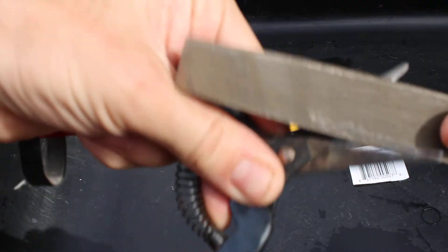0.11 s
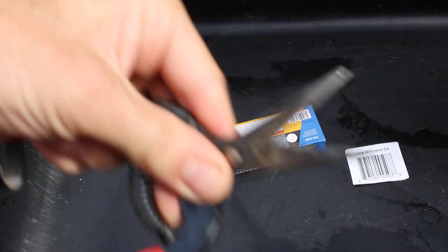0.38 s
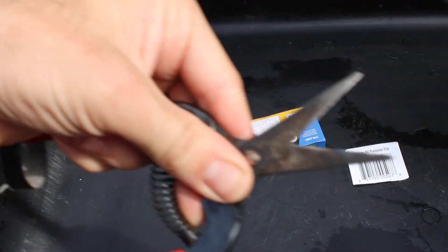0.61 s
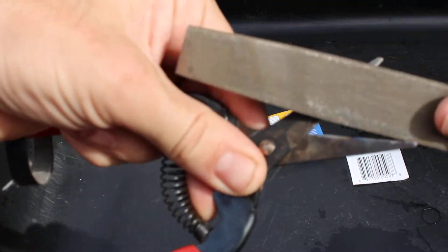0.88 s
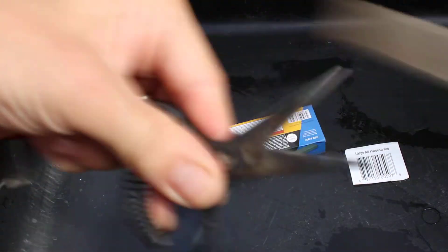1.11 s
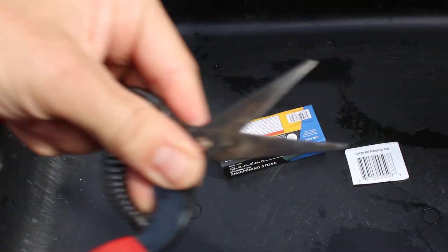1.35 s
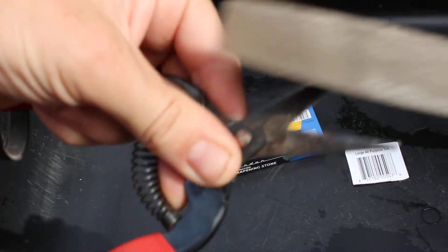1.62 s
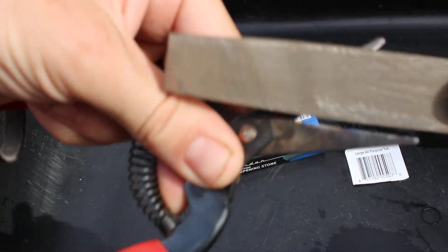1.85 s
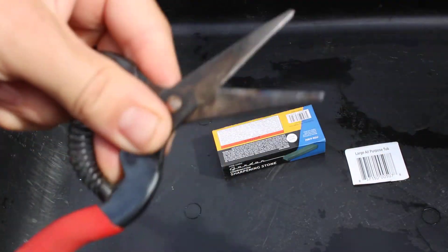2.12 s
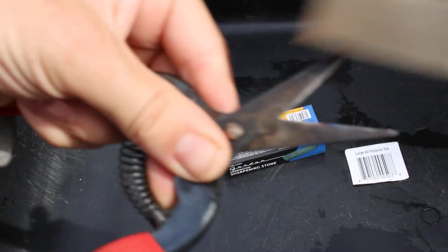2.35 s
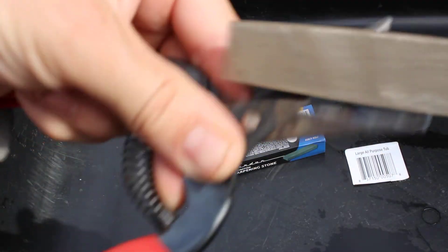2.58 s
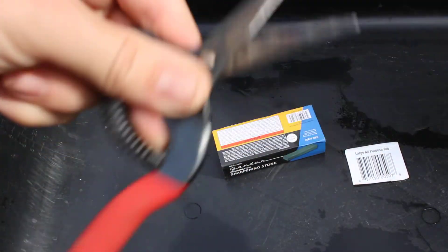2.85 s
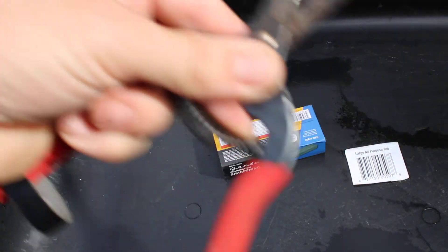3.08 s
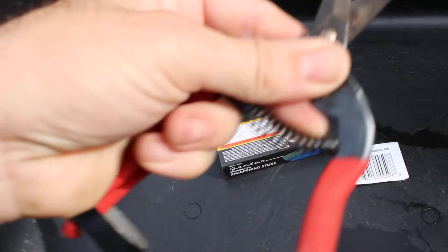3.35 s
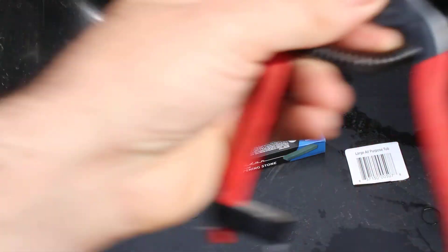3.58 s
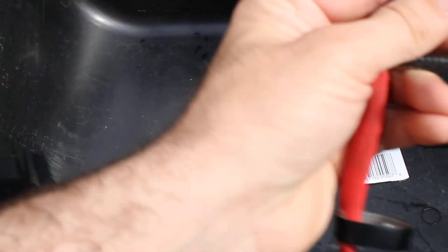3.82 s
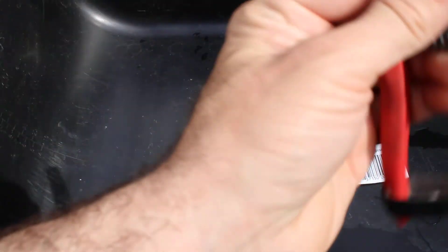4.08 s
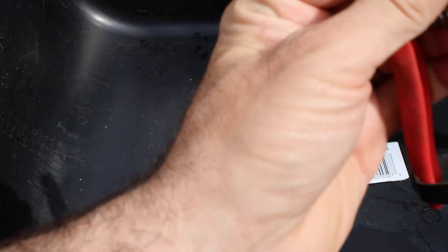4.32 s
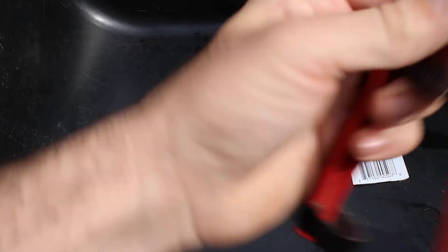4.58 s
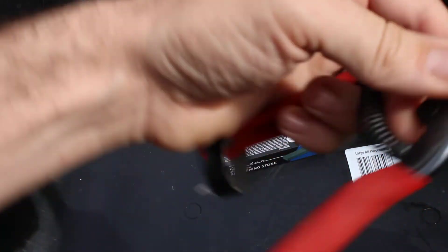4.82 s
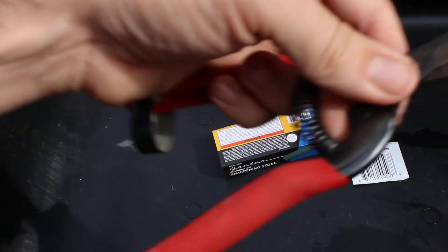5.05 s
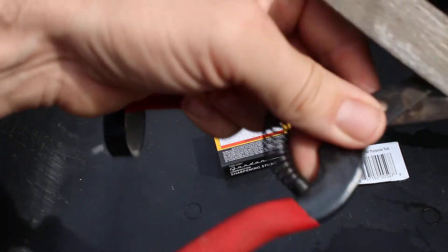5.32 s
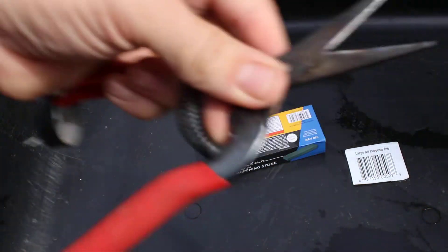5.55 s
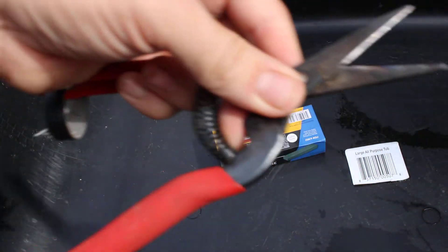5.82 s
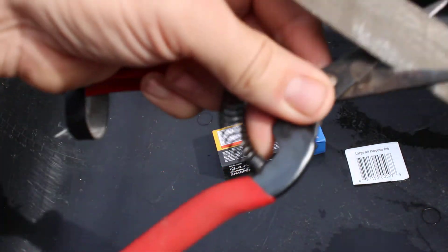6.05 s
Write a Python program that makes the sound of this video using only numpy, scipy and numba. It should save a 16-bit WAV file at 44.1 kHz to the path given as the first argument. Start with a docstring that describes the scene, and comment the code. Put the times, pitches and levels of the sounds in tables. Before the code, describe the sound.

Hand filing of shears, heard close up and dry: hard taps as steel meets steel, gritty scrapes that speed up within a tenth of a second, and abrupt bright snaps at release. After four strokes comes a two-second lull with faint handling clicks and soft road noise, then one strong stroke and new contact. Low wavering hum and thin insect trill continue, and automatic gain dips the background after loud blows.

```python
"""Filing the blades of a pair of shears

A flat hand file is laid on a short steel blade and pushed off its tip, stroke after stroke. Tooth impacts and
grit noise drive resonators for the bending blade and the modes of blade and file; taps excite the same steel.
Ticks and rubs are shaped noise. Far traffic (coloured noise), a motor hum (wavering sines) and an insect
(narrow-band noise) lie behind; automatic gain ducks everything after loud sounds."""
import sys
import numpy as np
from scipy import signal
from scipy.fft import rfft, irfft
from scipy.io import wavfile
from scipy.ndimage import uniform_filter1d
from numba import njit

SR = 44100
rng = np.random.default_rng(int(sys.argv[2]) if len(sys.argv) > 2 else 0)


def pcm_store(signal):
    """Save signal as 16-bit PCM."""
    levels = np.round(np.clip(np.atleast_2d(signal), -1, 1) * 32767)
    wavfile.write(sys.argv[1], SR, levels.astype(np.int16).T)


def ratio(d):
    """dB to gain"""
    e = np.asarray(d, float) / 20
    return 10 ** e


N = 272534

# Blows as steel lands on or leaves steel. Each row: time in seconds, relative peak in dB, brightness in dB,
# share of the lowest modes in dB, share of the file ring in dB, third bending pitch in Hz,
# relative level of the skid that follows in dB.
LANDINGS = [(0.0004, -6.5, -6, -28.5, -19, 3200, -26.5), (0.0227, -14.5, -19, -24, -31, 3140, -46),
            (0.2040, -11.5, -13, -12, -25, 3300, -34), (0.2814, 1.5, -7.5, -16, -37, 3760, -46.5),
            (0.8487, 2, -5, -10.5, -20, 3360, -30), (1.1244, -0.5, -14, -22, -50, 3550, -50),
            (1.732, -13, 1.5, -28.5, -27, 3620, -28), (2.001, 3.5, -22, -21.5, 4, 3960, -53),
            (2.4655, -8, -1, -32, -27.5, 3480, -15), (2.5052, -2.5, -16, -18.5, -30.5, 3370, -34.5),
            (2.6928, 7, -3, -30, -40.5, 3650, -55), (5.1915, -14, -6, -13, -4, 3080, -36),
            (5.371, -7.5, -17, -23.5, -20.5, 4080, -41), (5.3752, -2.5, -19, -22.5, -24.5, 4200, -38),
            (5.3802, -6.5, -13.5, -23.5, -25, 4100, -45), (6.0280, 2, -4, -7.5, -30, 3550, -20.5),
            (6.0663, -8.5, -39.5, -7, -36, 4160, -28), (6.1471, -20.5, -20, 9, -25, 3870, -42)]


def noise():
    """White Gaussian noise: equal mean power at all frequencies."""
    return rng.standard_normal(N)


def unit(x):
    """Normalisation to an rms of one."""
    return x / np.sqrt(np.mean(x ** 2))


def colour(x, points):
    """Minimum-phase filtering: a causal response through (Hz, dB) points, from the folded cepstrum."""
    hz, db = np.transpose(points)
    grid = np.arange(2049) * SR / 4096 + 1
    cepstrum = irfft(np.log(ratio(np.interp(np.log(grid), np.log(hz), db))))
    cepstrum[1:2048] *= 2
    cepstrum[2049:] = 0
    response = irfft(np.exp(rfft(cepstrum)))
    return signal.fftconvolve(x, unit(response) / 64)[:N]  # unit energy over 4096 samples


def walk(rate):
    """Random modulation: Gaussian levels held for 1 / rate seconds and slewed, with an rms of one."""
    k = int(SR / rate)
    held = np.repeat(rng.standard_normal(N // k + 1), k)
    return unit(uniform_filter1d(held, k)[:N])


def ring(force, hz, t60):
    """Damped harmonic oscillator: one mode that decays by 60 dB in t60 seconds."""
    pole = np.exp(2j * np.pi * hz / SR - np.log(1000) / (t60 * SR))
    return signal.lfilter([0, pole.imag], [1, -2 * pole.real, abs(pole) ** 2], force)


@njit
def svf(x, hz, width):
    """State-variable resonance: a band-pass with a moving centre and a gain of one there."""
    y, b, l = np.empty(len(x)), 0., 0.
    for i in range(len(x)):
        g, k = np.tan(np.pi * hz[i] / SR), width / hz[i]
        v = (b + g * (x[i] - l)) / (1 + g * (g + k))
        b, l, y[i] = 2 * v - b, l + 2 * g * v, k * v
    return y


def steep(x, hz, width):
    """Cascaded resonance: two equal band-passes leave dark valleys on either side."""
    return svf(svf(x, hz, width), hz, width)


def band(hz, width):
    """Band-limited noise: a steep fixed resonance driven by white noise, with an rms of one."""
    return unit(steep(noise(), np.full(N, 1. * hz), 1. * width))


def bursts(at_s, db, length_ms):
    """Exponential relaxation: sudden rises that die away with a time constant of length_ms."""
    out = np.zeros(N)
    out[(at_s * SR).astype(int)] = ratio(db)
    return signal.lfilter([1], [1, -np.exp(-1000 / (length_ms * SR))], out)


def traffic():
    """Superposed broadband sources: rumble and hiss swell together, and passing tyres rise and fade."""
    # Traffic level. Each row: time in seconds, level in dB.
    swell = [(0, -42.5), (.5, -44), (1, -44), (1.3, -35.5), (1.7, -43), (2.1, -45), (2.4, -41),
             (2.8, -43.5), (3.2, -44.5), (3.6, -41), (3.9, -47), (4.3, -44), (4.7, -45.5), (5.2, -46),
             (5.6, -42), (6.18, -36.5)]
    # Spectrum of the low rumble. Each row: frequency in Hz, relative density in dB.
    rumble_spectrum = [(15, -33.5), (25, -11.5), (118, 2), (184, -7), (210, -2.5), (334, -5.5), (403, -17),
                       (600, -27.5), (780, -48), (1320, -120)]
    # Spectrum of the hiss. Each row: frequency in Hz, relative density in dB.
    hiss_spectrum = [(240, -24.5), (400, -3), (588, -10.5), (1230, -13.5), (3140, -20.5), (5550, -23),
                     (5900, -25.5), (8410, -29.5), (14400, -47.5), (15800, -55)]
    # Tyres passing. Each row: time of the peak in seconds, its level in dB, fade to either side in dB per second.
    passes = [(1.1, -48, 27.5), (2.45, -56, 42.5), (3.62, -46, 31.5), (5.2, -52, 39)]
    t = np.arange(N) / SR
    rumble_db = np.interp(t, *np.transpose(swell))
    hiss_db = rumble_db - 3
    rumble = ratio(rumble_db + 0.51 * walk(3.7)) * colour(noise(), rumble_spectrum)
    hiss = ratio(hiss_db + 0.6 * walk(5.1)) * colour(noise(), hiss_spectrum)
    tyre_gain = sum(ratio(db - fade_db * abs(t - s)) for s, db, fade_db in passes)
    tyres = tyre_gain * ratio(0.89 * walk(9.4)) * band(990, 1300)
    return rumble + hiss + tyres


def motor_hum():
    """Line spectrum: sines whose pitch and level waver at random."""
    # Hum lines. Each row: mean frequency in Hz, relative level in dB.
    lines = [(91.5, -52.5), (123.8, -51.5), (183.0, -50.5), (269.2, -54), (716.0, -61.5)]
    out = np.zeros(N)
    for hz, db in lines:
        phase = 2 * np.pi * np.cumsum(hz + 2.248 * walk(5.4)) / SR
        out += ratio(db + 0.5 + 1.2 * walk(3.3)) * np.sin(phase)
    return out


def insect():
    """Narrow-band noise under amplitude modulation: a high trill whose level flickers."""
    return ratio(-64.5 + 1.5 * walk(60)) * band(5550, 200)


def rubs():
    """Sliding friction: fingers on the handles, as uneven noise that starts and stops within milliseconds."""
    # Each row: start in seconds, length in seconds, mean level in dB, centre in Hz, width in Hz.
    slides = [(1.192, 0.1, -40, 1900, 1990), (5.125, 0.061, -48.5, 2640, 1500),
              (5.21, 0.09, -54, 1510, 1484), (5.77, 0.055, -49.5, 2400, 1510),
              (5.773, 0.051, -53, 8830, 4960)]
    t = np.arange(N) / SR
    out = np.zeros(N)
    for s, length, db, hz, width in slides:
        gate = uniform_filter1d(1. * (t > s) * (t < s + length), 400)
        out += ratio(db + 2 * walk(81)) * gate * band(hz, width)
    return out


def ticks():
    """Heavily damped impact: short broad clicks with no ring, some from light touches of file on blade, others
    from shears and file shifting in the hands."""
    # Clicks. Each row: time in seconds, relative peak in dB.
    clicks = [(0.163, -32.5), (0.3115, -10), (0.317, -15), (1.0551, -31), (1.1611, -8.5), (1.163, -29),
              (1.764, -29.5), (2.7095, -10), (2.72, -12), (2.724, -23.5), (2.7688, -26), (4.0759, -17),
              (4.544, -35.5), (4.788, -41.5), (5.142, -31), (5.2883, -33), (5.7812, -33)]
    # Spectrum of a click. Each row: frequency in Hz, relative density in dB.
    click_spectrum = [(290, -53), (500, -4.5), (3000, -3), (4290, 5.5), (4740, -4.5), (6760, -0.5),
                      (15000, -30.5)]
    return ratio(-4.5) * colour(bursts(*np.transpose(clicks), 2.9) * noise(), click_spectrum)


def rasp(force, bright_db):
    """Contact stiffness: the dry sound of tooth on steel, brighter as the contact hardens."""
    # Spectrum of the contact. Each row: frequency in Hz, relative gain in dB.
    contact_spectrum = [(200, -63), (600, -42), (1500, -18), (3000, -1), (5000, -1.5), (8000, -2.5),
                        (10500, -15), (13000, -26), (16000, -59.5)]
    body = signal.sosfilt(signal.butter(2, 5000, fs=SR, output="sos"), force)
    treble = force - body
    return colour(body + treble * ratio(bright_db + 2), contact_spectrum)


def steel(force, bright_db, low_db, second_db, file_db, free, wander_db):
    """Modal superposition: damped modes of blade and file, struck unevenly as the contact point moves."""
    # Free modes. Each row: frequency in Hz, relative level in dB, undamped 60 dB decay time in seconds.
    free_modes = [(1278, -3, .075), (1890, -10, .05), (2290, -6, .04), (2815, -3, .05), (3402, -4, .036),
                  (3530, -8, .04), (3815, -12, .05), (4500, -14, .04), (5062, 2, .065), (5072, -24, .2),
                  (5460, -6, .025), (6094, -12, .035), (6390, -10, .045), (6870, -12, .035),
                  (7300, -8, .025), (7900, -3, .035), (7985, -19, .09), (8253, -16, .035), (9170, -14, .03),
                  (9700, -12, .04), (10540, -24, .04)]

    def share(hz):
        if hz < 1600:
            return low_db
        if hz < 2600:
            return second_db
        if hz < 4800:
            return 0
        return file_db if hz < 5300 else bright_db

    modes = np.zeros(N)
    for hz, db, t60 in free_modes:
        drive = force * ratio(share(hz) + wander_db * walk(60))
        modes += ring(drive, hz, free * t60) * ratio(db)  # free: share of the ring time left by contact
    return signal.sosfilt(signal.butter(3, 1000, "high", fs=SR, output="sos"), modes)


def taps():
    """Impulse excitation: each blow rings the modes, with a millisecond decay of tooth contacts."""
    s, peak_db, *columns, _ = np.transpose(LANDINGS)
    chatter = bursts(s, peak_db, 1.0) * np.sign(noise())
    blow = np.zeros(N)
    blow[(s * SR).astype(int)] = ratio(peak_db)
    # each tap's settings take over 1 ms before it
    latest = np.clip(np.searchsorted(s, np.arange(N) / SR + .001) - 1, 0, None)
    bright_db, low_db, file_db, third_hz = (c[latest] for c in columns)
    blade = svf(ratio(9.5) * chatter + ratio(23.5) * blow, third_hz, 330.0)
    modes = steel(blow, bright_db, low_db, -16.5, file_db, free=0.9, wander_db=2.5)
    return ratio(-2) * rasp(chatter, bright_db) + blade + ratio(-10) * modes


def tooth_rows(teeth_hz):
    """Periodic impact train: evenly cut teeth strike at the pace of the file, with jitter in time and strength."""
    passed = np.floor(np.cumsum(teeth_hz * (1 + .025 * walk(900))) / SR)
    strikes = unit(np.diff(passed, prepend=0) * ratio(2 * noise()))
    return strikes


def pressed_blade(force, rows, load, speed, bright_db):
    """Loaded cantilever: pressed against the file, the blade rings broadly and its bending pitches slide."""
    light_db, full_db = -40, -5  # loads between which the lower modes change their share
    low_db = np.interp(load, (light_db, full_db), (-5.5, -27))
    second_db = np.interp(load, (light_db, full_db), (-8, -12.5))
    # second pitch, then third pitch with the file at rest and at full speed, in Hz
    first_blade, second_blade = (2240, 3530, 3700), (2050, 3940, 3950)
    turned = np.arange(N) / SR >= 4.5  # the second blade is filed from 4.5 s
    second_hz, slow_hz, fast_hz = (np.where(turned, 1. * b, a) for a, b in zip(first_blade, second_blade))
    third_hz = (slow_hz + (fast_hz - slow_hz) * speed) * (1 + 0.014 * walk(80))
    low_hz, second_hz, bright_hz = (hz * (1 + 0.051 * walk(40)) for hz in (1254, second_hz, 6230))
    first = ratio(25.5) * steep((force + ratio(3) * rows) * ratio(low_db - 4), low_hz, 170.0)
    second = ratio(21.5) * steep(force * ratio(second_db), second_hz, 330.)
    third = ratio(16) * steep(force, third_hz, 650.0)
    treble = ratio(13.5) * svf(force * ratio(bright_db), bright_hz, 600.0)
    return first + second + third + treble


def strokes():
    """Stick-slip friction: tooth rows and caught grit drive the steel while the file's pressure judders."""
    # One list a stroke. Each row: time in seconds, pressure in dB, mean rate of teeth in Hz,
    # even teeth against loose grit in dB before the teeth are band-limited.
    stroke_curves = [
        [(0.15, -49, 201.1, -10), (0.222, -45.5, 247, -10), (0.245, -13.5, 478.8, -10),
         (0.268, -19.5, 1280, -1), (0.278, -20.5, 1313, 3.5), (0.298, -44, 1300, -10)],
        [(1.05, -59.5, 200, -5), (1.072, -31.5, 281.3, 0), (1.094, -11.5, 399.4, 2.5), (1.104, -11, 715, -6),
         (1.126, -11.5, 1001, -5.5), (1.14, -47.5, 1000, -5)],
        [(1.885, -53.5, 350, -2.5), (1.911, -21.5, 448.4, -9), (1.95, -12, 983.7, -8), (1.966, -11, 1109, 10),
         (1.982, -6, 1108, 6), (2.006, -3, 1028, -4), (2.016, -40, 1000, -7.5)],
        [(2.59, -48.5, 200, -8.5), (2.64, -23.5, 320.2, 1.5), (2.665, -14.5, 419, -2), (2.68, -10.5, 1107, -8),
         (2.69, -9.5, 1127, -9.5), (2.7, -37, 1106, -5.5), (2.735, -45.5, 1124, -9)],
        [(5.32, -36.5, 200, -4), (5.334, -31.5, 197.3, -6.5), (5.345, -40.5, 200, -4), (5.365, -56, 220, -6.5),
         (5.372, -26.5, 260.3, 4), (5.41, -22, 700, 4), (5.432, -10.5, 978, -2.5), (5.448, -11, 1163, 9),
         (5.465, -3.5, 1197, 6), (5.507, -4.5, 1230, -12.5), (5.518, -33.5, 1244, -11)],
        [(6.14, -69, 200, 0), (6.18, -18, 300, -5)],
    ]
    # Surges of pressure as the file bites. Each row: time in seconds, relative peak in dB.
    bites = [(0.2295, -13), (0.2353, -5.5), (0.2412, -7), (0.2471, -11), (0.254, -9), (0.263, -2),
             (1.0758, -5), (1.0913, -3), (1.105, -8.5), (1.1221, 2), (1.9146, -13.5), (1.9307, -14),
             (1.9629, -4), (1.9776, 0.5), (2.6297, -9.5), (2.644, -5), (2.6555, -3), (2.663, -12),
             (2.6724, 1), (5.3233, -10), (5.3325, -2), (5.349, -6), (5.4200, 1.5), (5.4294, 0), (5.4565, 5),
             (5.4704, 4), (5.4829, 5.5), (6.156, -9.5), (6.1714, -1)]
    t = np.arange(N) / SR
    s, *columns = np.vstack(stroke_curves).T
    press_db, teeth_hz, even_db = (np.interp(t, s, c) for c in columns)
    touching = sum((t >= c[0][0]) & (t < c[-1][0]) for c in stroke_curves) > 0

    tap_s, skid_db = np.transpose(LANDINGS)[[0, -1]]
    skids = bursts(tap_s, skid_db, 13)
    press = ratio(press_db) * uniform_filter1d(1. * touching, 90) + skids
    surges = uniform_filter1d(bursts(*np.transpose(bites), 3.1), int(1.2 * SR / 1000) + 1)  # 1.2 ms rise
    grip = press + ratio(-11.5) * surges
    load = 20 * np.log10(grip + 1e-9)

    speed = np.clip(teeth_hz * touching / 1200, 0, 1)  # full speed at 1200 teeth per second
    thud_db = -9.5 + (-47 + 9.5) * speed
    bright_db = -16 + (-7.5 + 16) * speed
    # the treble swells around each curve's last point but one, as the file nears the tip
    bright_db += 5 * sum(np.exp(-abs(t - c[-2][0]) / 0.028) for c in stroke_curves)

    grit = unit((rng.random(N) < .4) * noise() * ratio(2.5 * walk(300)))
    rows = tooth_rows(teeth_hz) * ratio(even_db) * touching
    # blunt teeth give few high overtones
    rows = signal.sosfilt(signal.butter(2, (180, 4200), "band", fs=SR, output="sos"), rows)
    force = (grit + rows) * grip

    scrape = ratio(2.0) * rasp(force, bright_db)
    bending = pressed_blade(force, rows * grip, load, speed, bright_db)
    modes = ratio(-30) * steel(force, bright_db + 7, -23, -15.5, -20, free=.65, wander_db=5.0)
    thud = touching * grip * ratio(thud_db) * band(270, 200)
    # slow teeth shake the handles at their 350 Hz resonance
    handles = ratio(5) * steep(rows * press, np.full(N, 350.), 220.)
    return scrape + bending + modes + thud + handles


def tray(dry):
    """Diffuse reverberation: the hard tray under the hands returns a tail that falls 60 dB in 0.21 s."""
    t = np.arange(SR // 4) / SR
    tail = rng.standard_normal(len(t)) * ratio(-60 * t / 0.21) * (t > .002)
    return dry + ratio(-55) * signal.fftconvolve(dry, tail)[:N]


def scene():
    """Linear superposition: the sounds near the tray with its tail, over the distant background."""
    background = traffic() + motor_hum() + insect()
    near = rubs() + ticks() + taps() + strokes()
    return (tray(near) + background)[None]


@njit
def duck(x, top, slope, hold, attack, release):
    """Dynamic compression: a cut in dB follows the held peak above top, quickly down and slowly back."""
    y, peak, cut = np.empty(len(x)), 1e-9, 0.
    for i in range(len(x)):
        peak = max(abs(x[i]), peak * hold)
        want = slope * max(0., 20 * np.log10(peak / top))
        cut += (want - cut) * (attack if want > cut else release)
        y[i] = x[i] * 10 ** (-cut / 20)
    return y


def band_limit(x):
    """A steep low-pass at the top of the band."""
    return signal.sosfilt(signal.butter(12, 15950, fs=SR, output="sos"), x)


def record(dry):
    """Compression and saturation: automatic gain, peaks rounded at full scale, the top rolled off."""
    hold_s, attack_s, release_s = 0.036, 0.067, 0.3
    levelled = duck(dry[0], ratio(-14), 0.96, np.exp(-1 / (hold_s * SR)), 1 / (attack_s * SR), 1 / (release_s * SR))
    rounded = levelled / (1 + levelled ** 6) ** (1 / 6)
    mix = signal.sosfilt(signal.butter(6, 15000, fs=SR, output="sos"), rounded)
    return band_limit(mix[None])


dry = scene()
out = record(dry)
pcm_store(out)
```